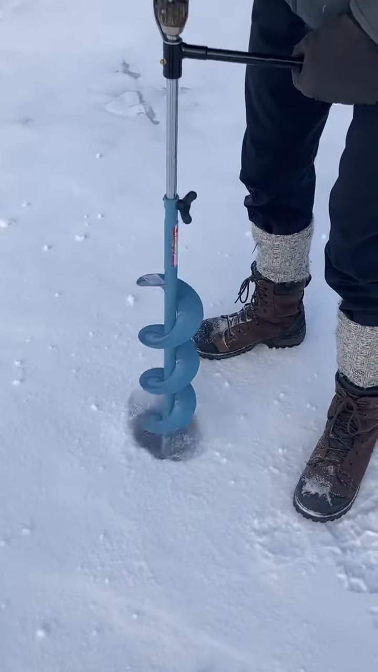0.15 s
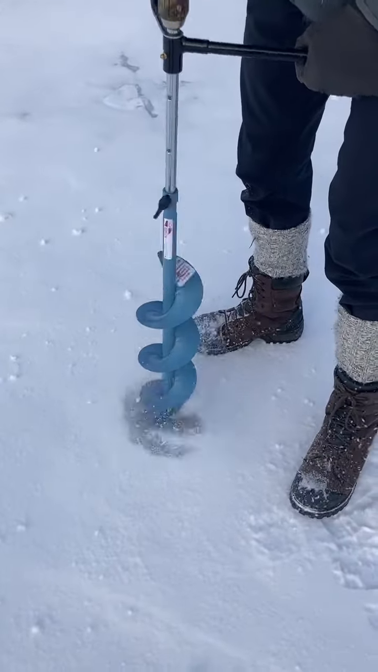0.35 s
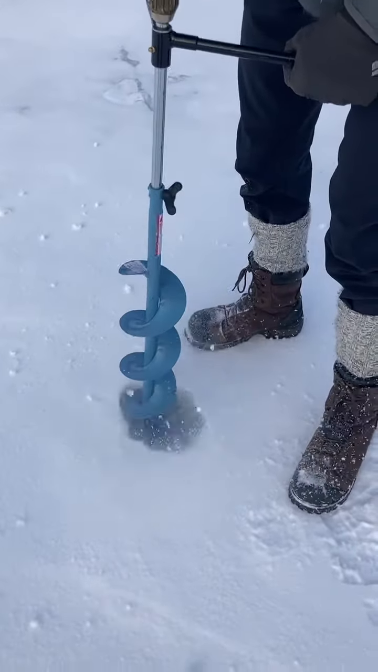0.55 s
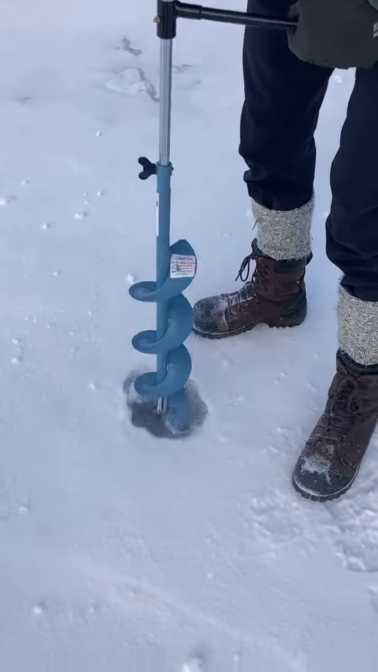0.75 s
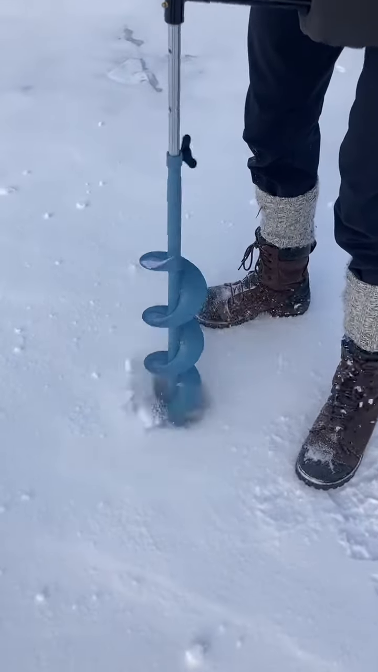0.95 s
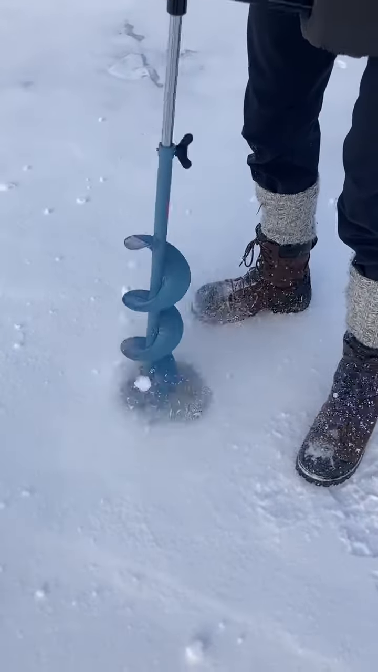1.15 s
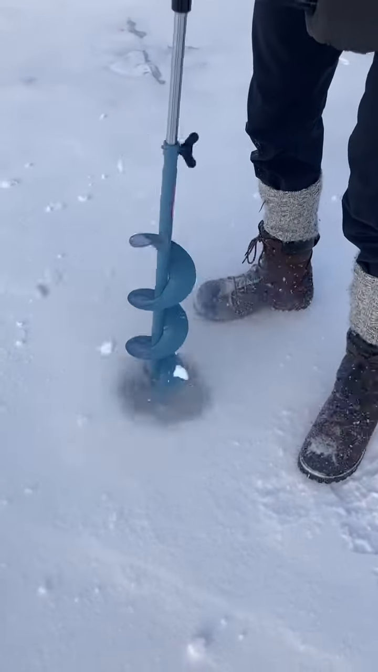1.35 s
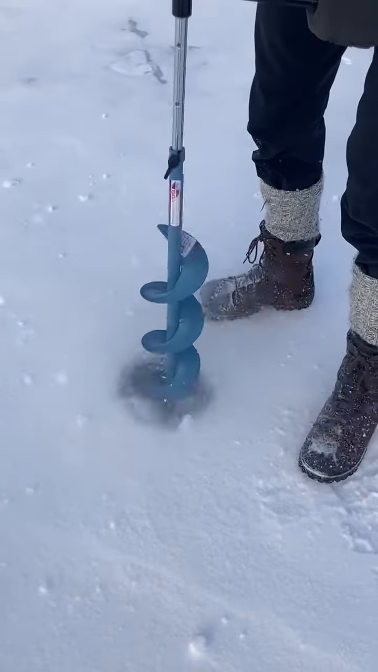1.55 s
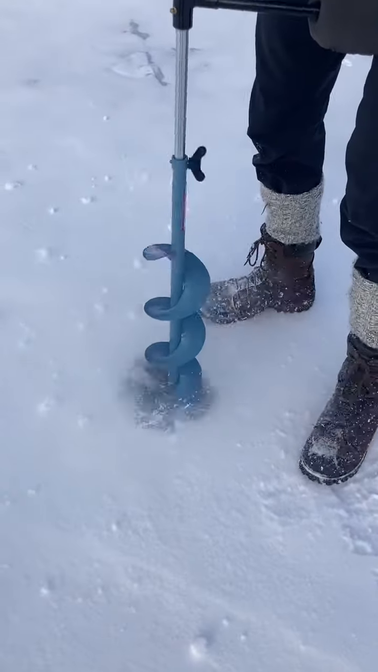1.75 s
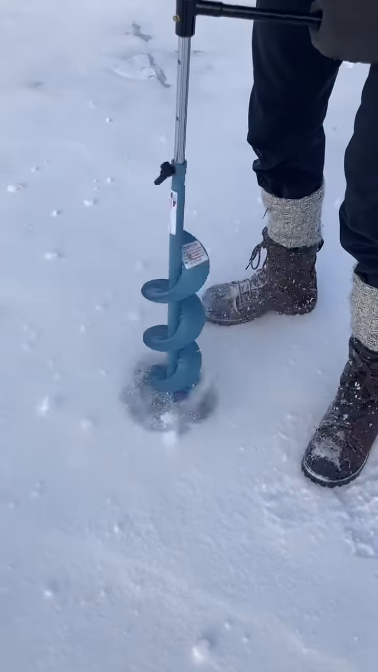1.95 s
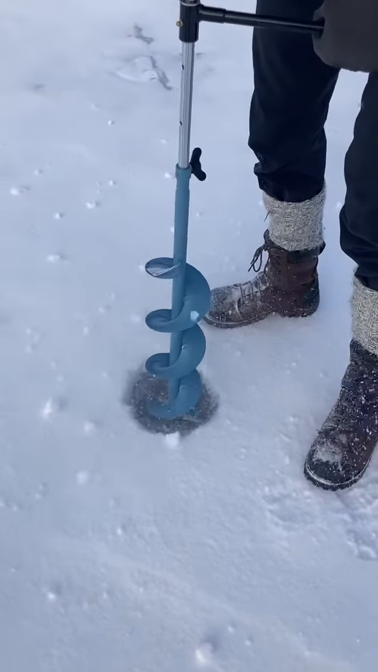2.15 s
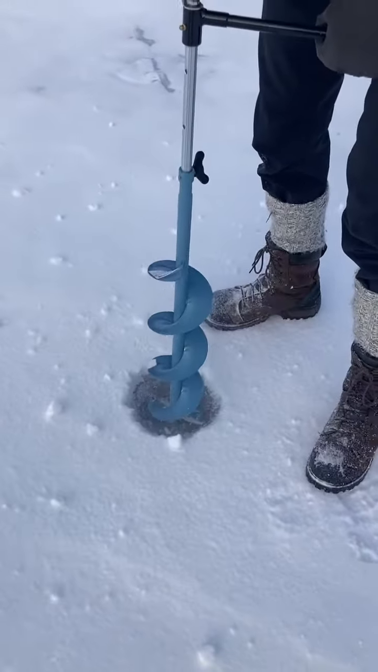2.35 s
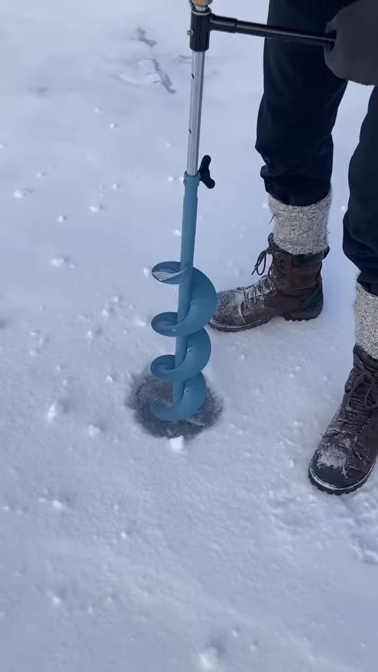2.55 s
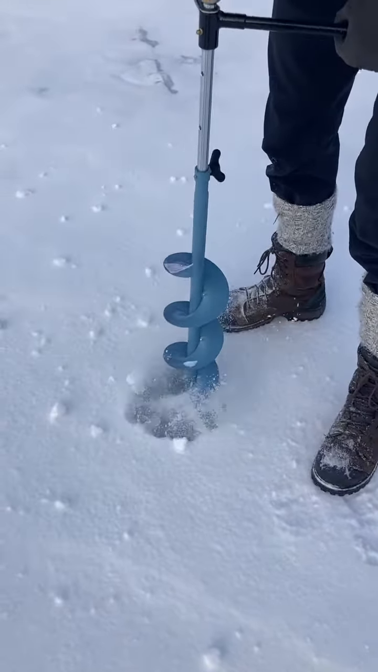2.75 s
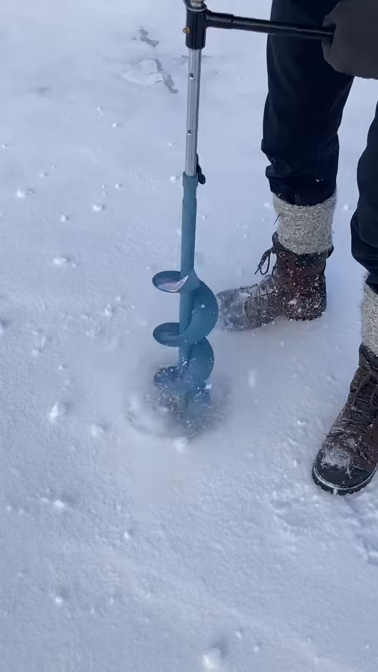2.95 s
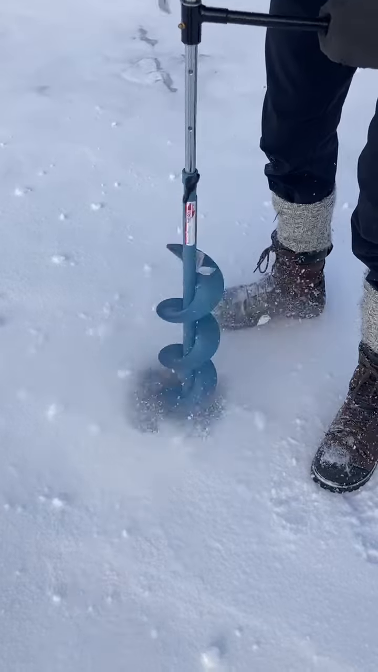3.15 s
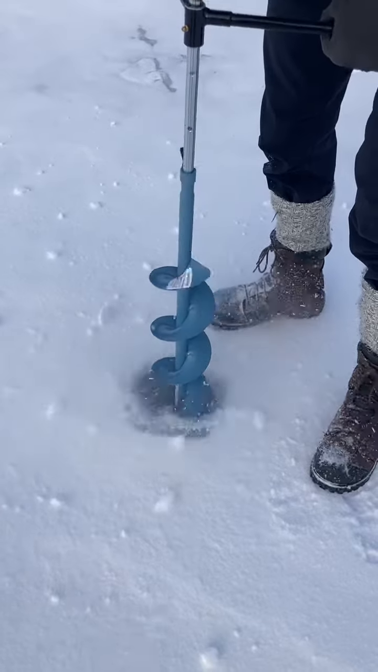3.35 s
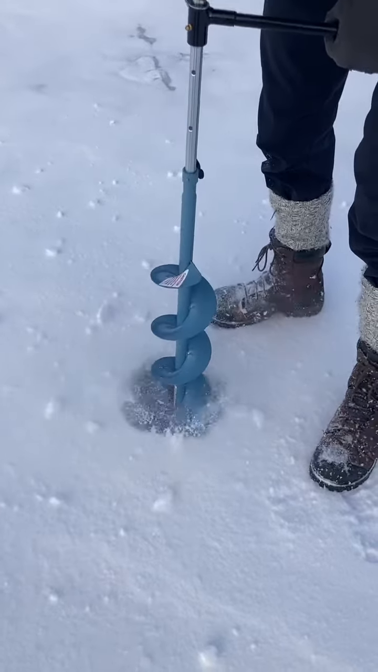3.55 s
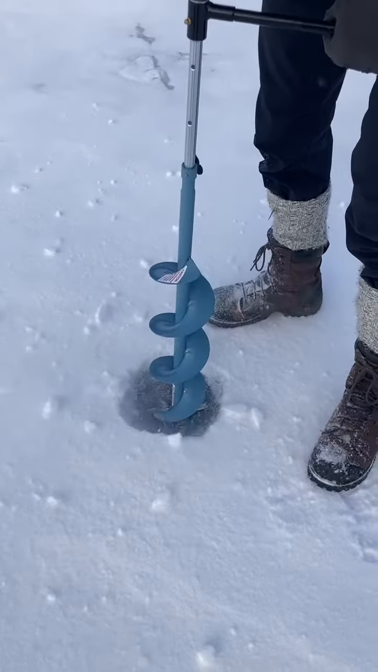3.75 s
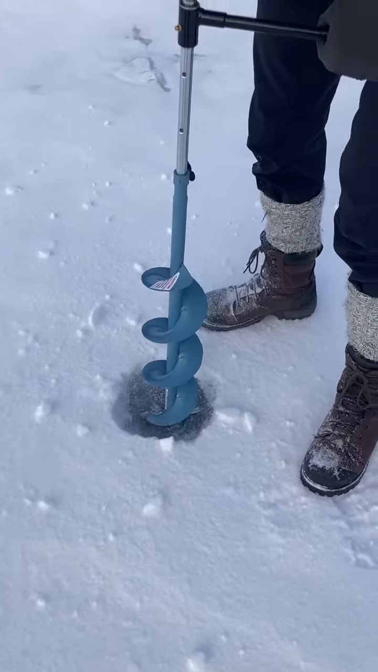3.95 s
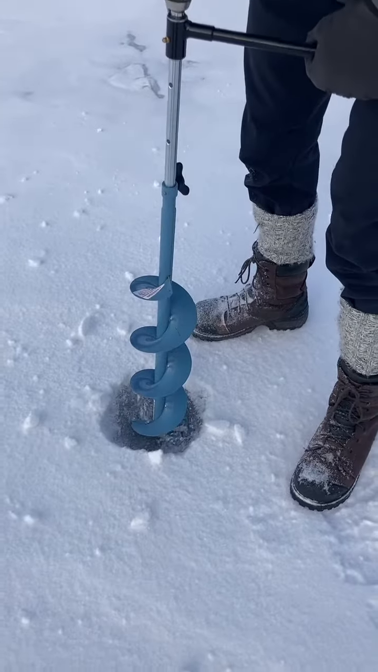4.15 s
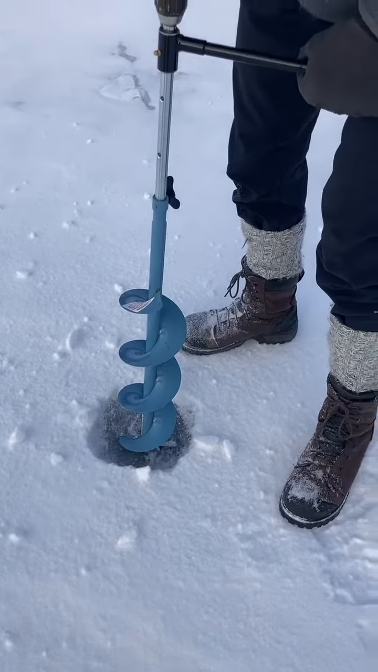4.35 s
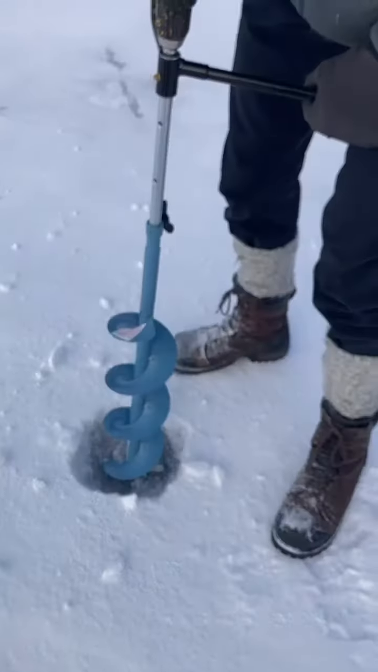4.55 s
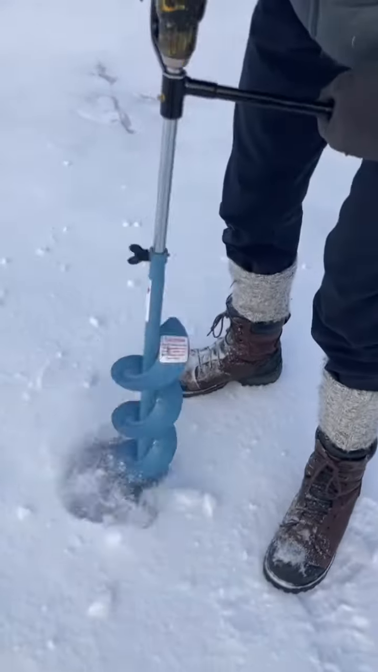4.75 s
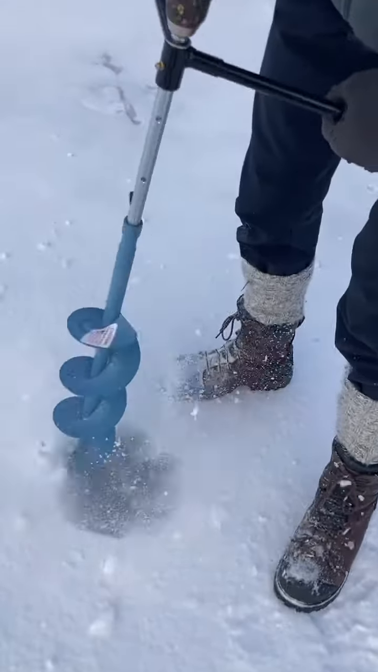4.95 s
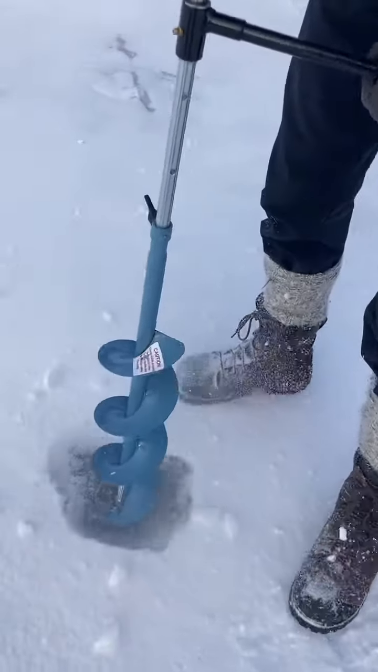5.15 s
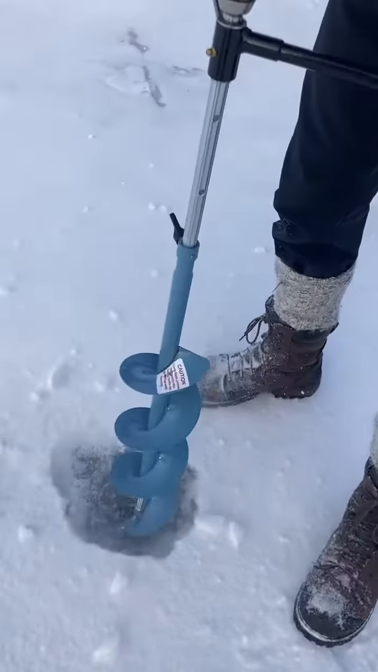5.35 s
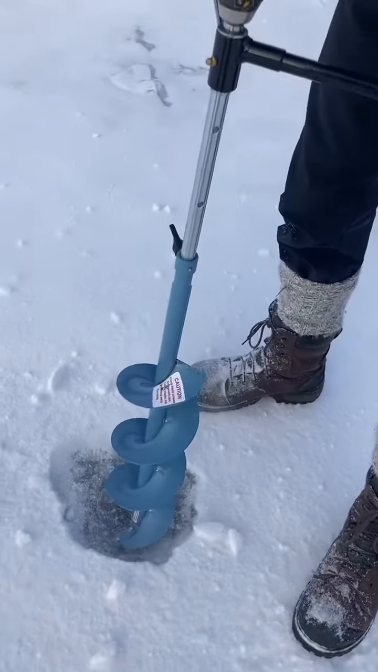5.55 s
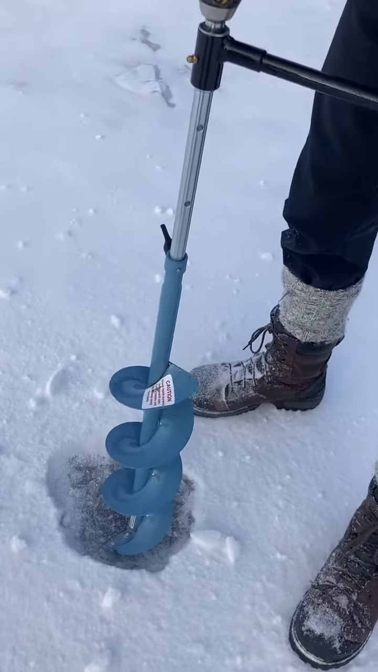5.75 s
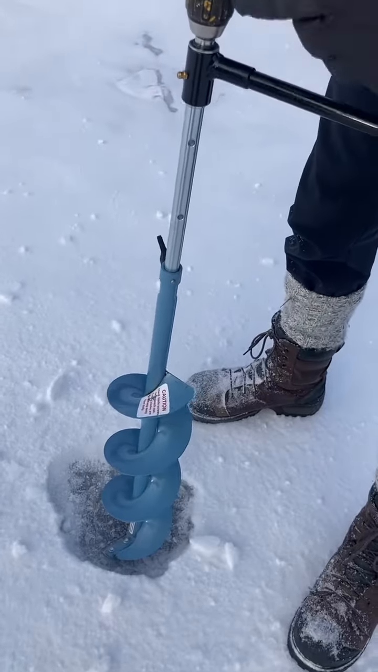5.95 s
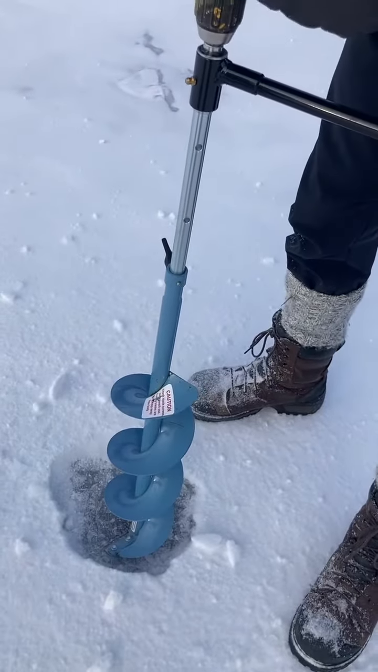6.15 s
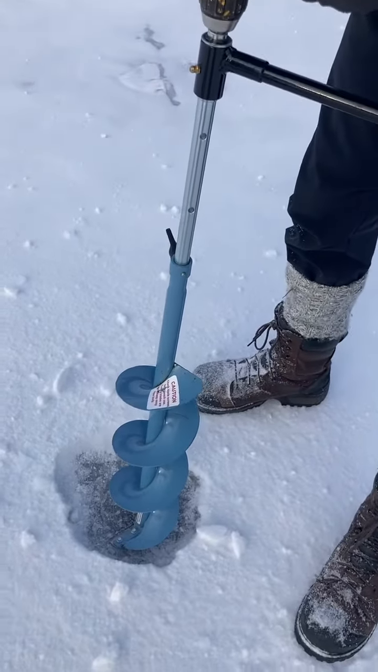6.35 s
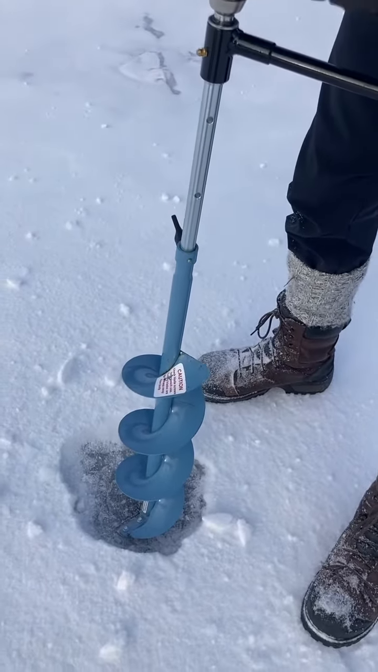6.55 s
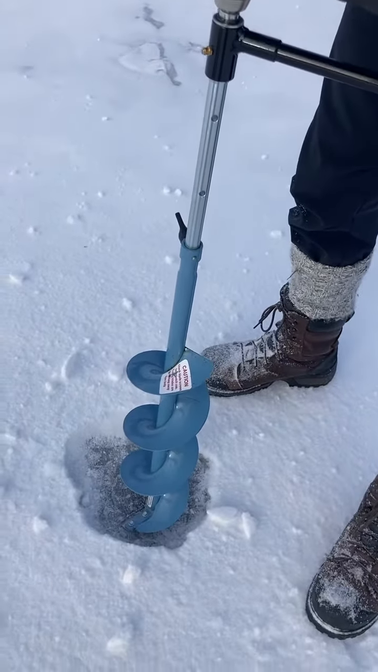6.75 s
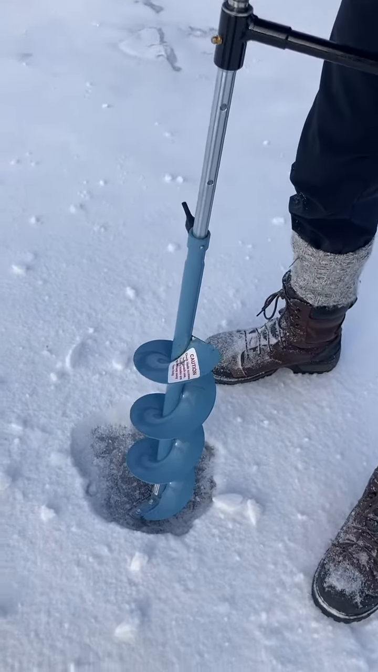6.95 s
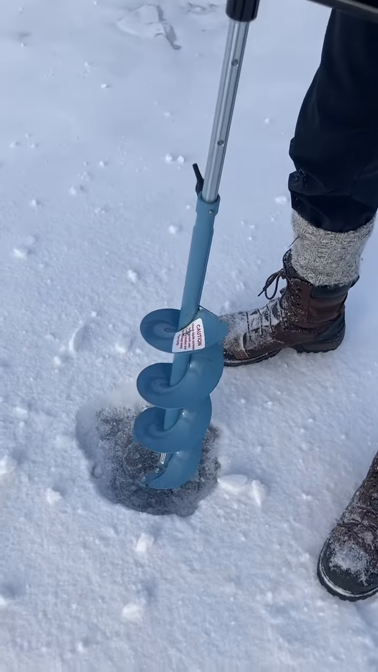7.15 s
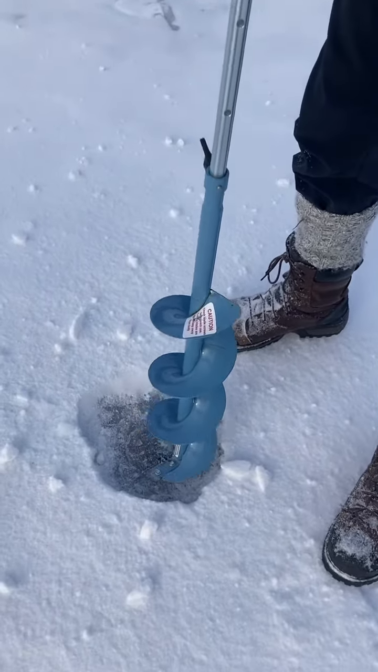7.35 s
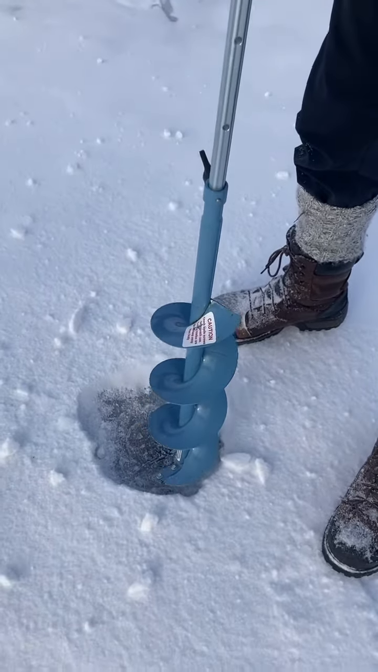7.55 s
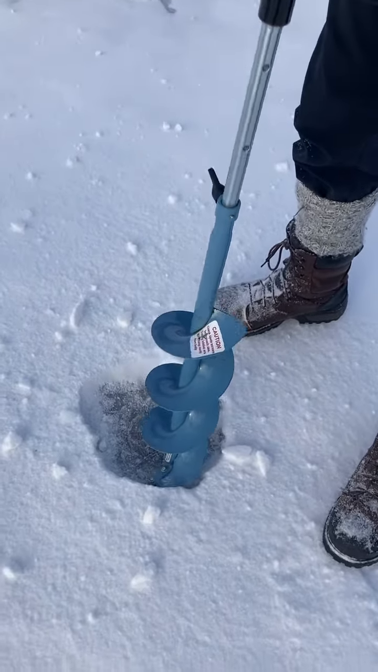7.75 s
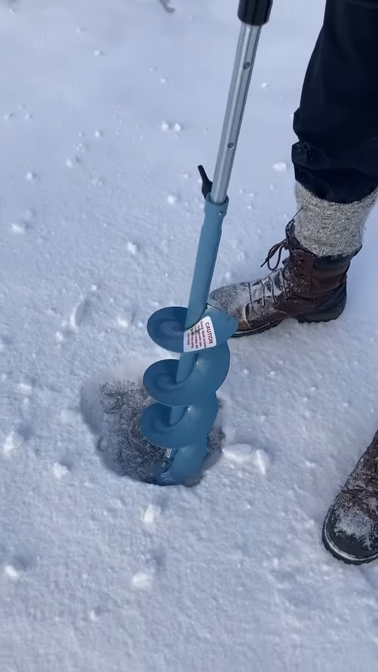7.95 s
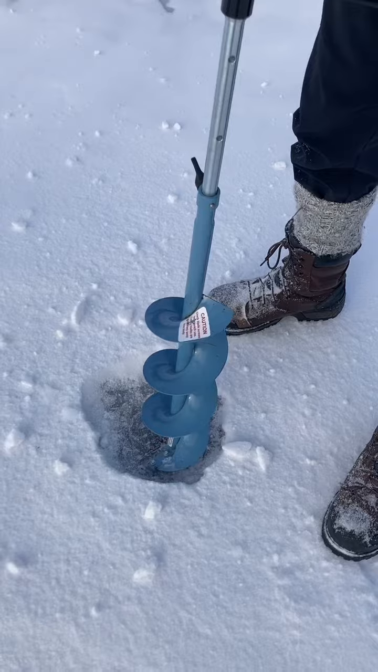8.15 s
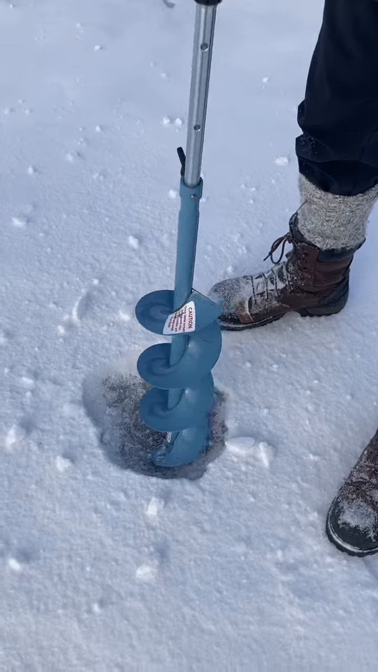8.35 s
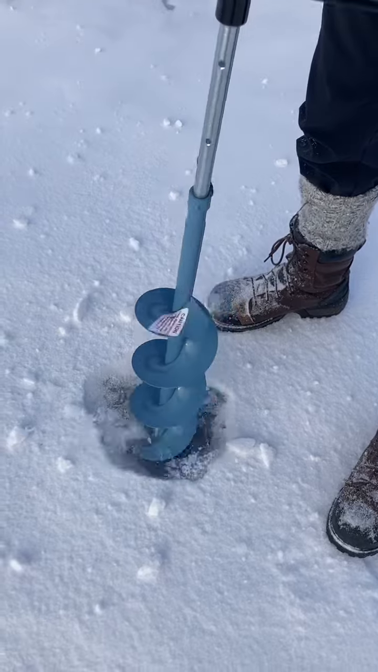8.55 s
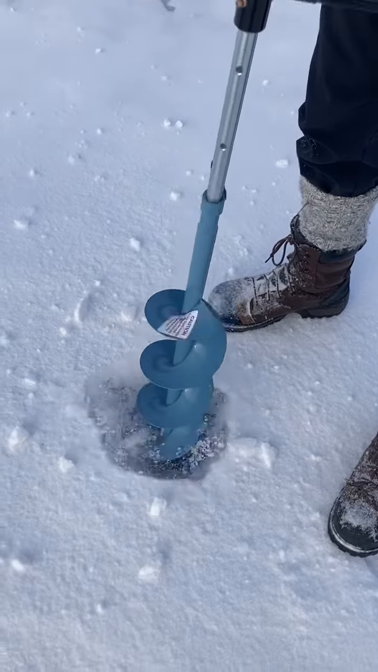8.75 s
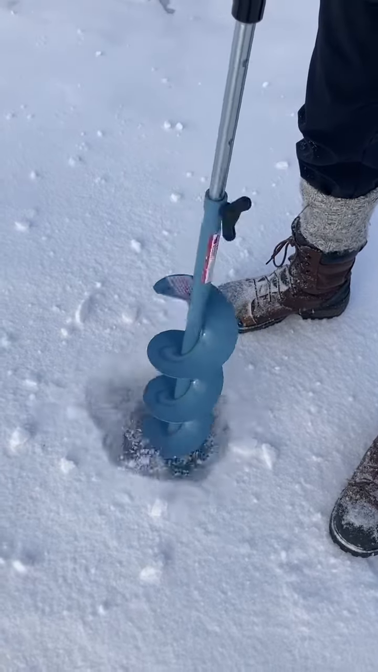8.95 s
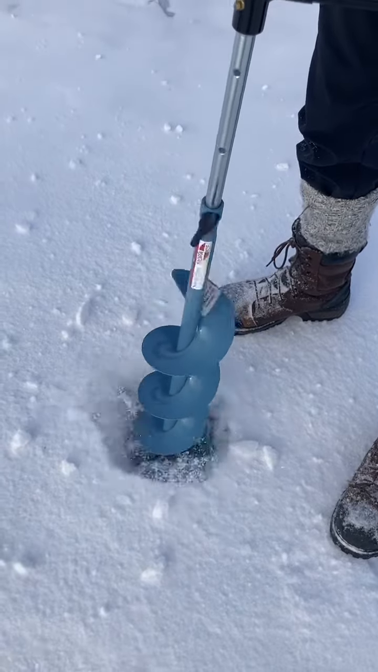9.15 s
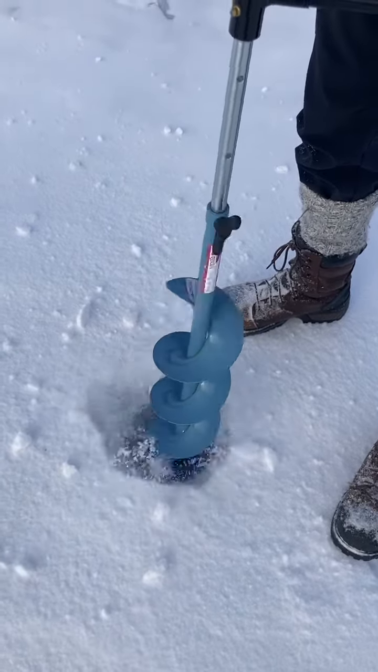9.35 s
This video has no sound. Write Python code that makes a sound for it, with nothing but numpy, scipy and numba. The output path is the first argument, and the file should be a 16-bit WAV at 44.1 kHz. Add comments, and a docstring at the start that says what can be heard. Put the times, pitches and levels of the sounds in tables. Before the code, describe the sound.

Outdoors on a frozen lake, close and dry, with faint low winter air. Drilling is already starting at 0 s: a loud gritty burst with sharp ice cracks and metallic knocks until 0.4. A longer run from 0.65 to 2.0 crunches and throbs about sixteen times a second, leaving a very faint tone. A third, 2.5 to 3.5, rings more in the tube, with rough gear whine. Around 4.0 blades scrape briefly; at 4.55 to 4.8 a short fast burst gives a hard clang, running down into scrapes. From 5 to 5.7 chips patter as small thuds under hissing ice dust, with a clink at 5.5. Quiet snow creaks and drops follow, dry clicks at 6.3 and, stronger, 7.2, then crunching boots, a scrape near 7.6 and a creak at 8.06. From 8.3 brisk grinding with higher whine and cracks continues until the end at 9.5.

```python
"""Hand auger drilling lake ice

A cordless drill spins a steel hand auger in lake ice, in bursts, a step away from a phone with two ports.
The blades shave ice in dense noise cracks that surge at each half turn and ring the modes of the auger tube;
the gears whine as a rough band of tone. Chips drop on snow as falling thuds, boots creak in clustered noise,
and short clinks and clicks sound between the runs, over hissing ice dust, a low rumble and open winter air."""
import sys
import numpy as np
from scipy import signal
from scipy.fft import rfft, irfft, next_fast_len
from scipy.io import wavfile
from scipy.ndimage import uniform_filter1d
from numba import njit

SR = 44100
rng = np.random.default_rng(int(sys.argv[2]) if len(sys.argv) > 2 else 0)


def wrap_up_sound(samples):
    """Save the sound to the file named by the first command line argument, as 16-bit audio."""
    columns = np.atleast_2d(samples).T
    # keep every value between -1 and 1, then stretch to whole-number steps
    tamed = np.clip(columns, -1, 1)
    steps = np.round(tamed * 32767).astype(np.int16)
    wavfile.write(sys.argv[1], SR, steps)


N = 414981
T = np.arange(N) / SR


def undb(db):
    """Decibels to amplitude."""
    return np.exp(np.asarray(db) * (np.log(10) / 20))


def unit(x):
    """Scale to an rms of 1."""
    return x / np.sqrt(np.mean(x ** 2))


def band(x, hz, width_hz):
    """Two-pole resonance, gain 1 at the centre."""
    return signal.lfilter(*signal.iirpeak(hz, hz / width_hz, SR), x)


def band_twice(x, hz, width_hz):
    """The same resonance twice in a row, for steeper skirts."""
    return band(band(x, hz, width_hz), hz, width_hz)


def colour(x, points, size=1024):
    """Causal filter shaped by (pitch_hz, level_db) points; keeps white noise at its level."""
    hz, db = np.transpose(points)
    grid = np.maximum(np.arange(size // 2 + 1) * SR / size, 1)
    # fold the cepstrum onto positive times: minimum phase
    cepstrum = irfft(np.interp(np.log(grid), np.log(hz), db) * np.log(10) / 20)
    cepstrum[1:size // 2] *= 2
    cepstrum[size // 2 + 1:] = 0
    taps = irfft(np.exp(rfft(cepstrum)))
    return signal.oaconvolve(x, taps / np.linalg.norm(taps))[:N]


def walk(rate):
    """Random levels held 1 / rate s and slewed; spread near 1."""
    hold = int(SR / rate)
    levels = np.repeat(rng.standard_normal(N // hold + 1), hold)
    return uniform_filter1d(levels, hold)[:N]


def grains(spread_db):
    """Dense cracks: most are small, a few stand out."""
    size_db = spread_db * np.minimum(rng.exponential(size=N), 4)
    return unit(rng.standard_normal(N) * undb(size_db))


def bursts(start_s, level_db, t60_s, rise_s):
    """Sum of envelopes with a quick rise and an exponential fall."""
    env = np.zeros(N)
    for start, top, fall in zip(start_s, undb(level_db), np.clip(t60_s, .01, 1)):
        i = int(start * SR)
        t = T[:min(int(fall * SR), N - i)]
        env[i:i + len(t)] += top * (1 - np.exp(-t / rise_s)) * 10 ** (-3 * t / fall)
    return env


EDGE_DB = 40  # depth of a rise or fall in level


def swells(start_s, stop_s, level_db, end_db, rise_s, fall_s):
    """Sum of envelopes: a rise from start, a hold that slides from level to end until stop, a fall."""
    env = np.zeros(N)
    for start, stop, level, end, rise, fall in np.broadcast(start_s, stop_s, level_db, end_db, rise_s, fall_s):
        times = np.maximum.accumulate([start, start + rise, stop, stop + fall, stop + 3 * fall])
        levels = [level - EDGE_DB, level, end, end - EDGE_DB, -150]
        on = slice(max(int(start * SR), 0), int(times[-1] * SR))
        env[on] += undb(np.interp(T[on], times, levels))
    return env


@njit
def drifting(x, hz, width_hz):
    """State-variable resonance whose centre moves, retuned every 64 samples; gain 1 at the centre."""
    y = np.empty(len(x))
    band_state, low_state, g, k = 0., 0., 0., 0.
    for i in range(len(x)):
        if i % 64 == 0:
            g, k = np.tan(np.pi * hz[i] / SR), width_hz / hz[i]
        v = (band_state + g * (x[i] - low_state)) / (1 + g * (g + k))
        band_state, low_state = 2 * v - band_state, 2 * (low_state + g * v) - low_state
        y[i] = k * v
    return y


def whine(hz, env, memory, waver):
    """A rough, wavering band of tone: slow noise carried up to hz; more memory narrows the band."""
    turn = np.exp(2j * np.pi * np.cumsum(hz * (1 + waver * walk(19))) / SR)
    rough = signal.lfilter([1], [1, -memory], rng.standard_normal((2, N)))
    tone = unit(np.real(turn * (rough[0] + 1j * rough[1])))
    return tone * env * undb(2 * walk(11))


# Spectrum of the cracking ice: pitch_hz, level_db (relative, per Hz)
ICE_SPECTRUM = [(40, -21.5), (80, -16), (400, -18.5), (820, -32), (1200, -29.5), (3300, -15), (4300, -9),
                (5100, -8.5), (6300, -3.5), (8300, 0), (11000, 0), (13500, -8), (15500, -9.5)]
CRUNCH_DB = -13  # coarse lumps torn off the ice, under the shaving


def auger():
    """Shaving, knocks and clinks: cracks in the ice, and the same kind of force in the tube."""
    crack_env, blow_env = auger_forces()
    cracks = colour(shards(patchy_db=3.0) * crack_env, ICE_SPECTRUM)
    lumps = crunch() * crack_env
    ring = tube(grains(1.2) * blow_env, patchy_db=3.0)
    blades = undb(CRUNCH_DB) * lumps + undb(3.5) * cracks + undb(1.0) * ring
    return blades, cracks_around(crack_env, blow_env)


# Drill runs: start_s, stop_s, shaving_start_db, shaving_stop_db, ring_db, spin_up_s, run_down_s,
# throb_origin_s (a time from which the half turns are counted), half_turns_per_s, gear_whine_db;
# shaving and ring are balanced further down the chain
DRILL_RUNS = [(0.021, 0.406, -19.5, -24, -29.5, 0.079, 0.2, 0.1, 14.6, -42),
              (0.65, 2.024, -25, -26, -35, 0.069, 0.057, 0.5, 16.1, -57),
              (2.493, 3.486, -27.5, -25.5, -37, 0.07, 0.069, 2.5, 15, -40),
              (4.547, 4.78, -26.5, -26.5, -30.5, 0.071, 0.4, 4.627, 27, -37.5),
              (8.281, 9.5, -23, -27, -30, 0.1, .05, 8.07, 20.3, -30)]
# Blades dragged over the ice by hand: start_s, stop_s, shaving_start_db, shaving_stop_db, ring_db, rise_s, fall_s
HAND_SCRAPES = [(3.913, 3.975, -41, -40, -46, 0.044, 0.034),
                (3.968, 4.079, -40.5, -28.5, -45, 0.029, 0.068),
                (4.355, 4.534, -57.5, -50.5, -58, 0.016, 0.15),
                (4.877, 5.033, -45.5, -33, -43.5, 0.017, 0.28), (5.12, 5.25, -59, -36, -66.5, 0.057, 0.057),
                (7.558, 7.64, -34, -36, -36.5, 0.053, 0.19), (7.75, 7.811, -59, -54, -67, 0.025, 0.038)]
# Single cracks and knocks of the blades, strong and faint: start_s, crack_db, tube_blow_db, t60_s;
# levels relative, trimmed as they are played
BLADE_KNOCKS = [(0.05, -21.5, -23, 0.085), (0.0701, -9.5, -33.5, 0.075), (0.119, -16, -24, 0.087),
                (0.1673, -2.5, -38.5, 0.053), (0.2284, -11, -29.5, 0.08), (0.2775, -7.5, -35, 0.059),
                (0.336, -4, -12.5, 0.088), (0.4, -13.5, -37, 0.08), (0.687, -33.5, -28, 0.088),
                (0.721, -20.5, -29.5, 0.27), (0.7508, 1, -24.5, 0.069), (0.767, -14, -26.5, 0.06),
                (0.805, -8.5, -34, 0.086), (0.817, -7.5, -25, 0.087), (0.852, -9.5, -34.5, 0.1),
                (0.866, -12, -34.5, 0.1), (0.9, -9.5, -20.5, 0.08), (0.927, 2.5, -11.5, 0.05),
                (0.956, -31, -22, 0.03), (0.9893, -4.5, -45, 0.08), (1.055, -27, -49, 0.06),
                (1.103, -12.5, -39, 0.051), (1.166, -28, -24, 0.055), (1.2254, -7.5, -48, 0.055),
                (1.2869, -12, -48, 0.055), (1.334, -29, -43, 0.06), (1.392, -5, -30, 0.054),
                (1.5628, -11, -38, 0.093), (1.622, -6.5, -30, 0.064), (1.674, -11.5, -33, 0.16),
                (1.81, -7.5, -29, 0.098), (1.8664, -4, -13, 0.074), (1.995, -20, -29, 0.09),
                (2.521, -39, -19, 0.07), (2.627, -14, -18.5, 0.12), (2.67, -15, -16.5, 0.17),
                (2.728, -14.5, -17, 0.11), (2.775, -19, -16.5, 0.09), (2.829, -8, -17.5, 0.13),
                (2.894, -8, -18.5, 0.1), (2.96, -6, -22, 0.065), (3.0253, -8, -51, 0.072),
                (3.068, -10, -31, 0.096), (3.131, -7.5, -43, 0.1), (3.2584, -26, -46, 0.072),
                (3.426, -11, -22, 0.096), (3.998, -33, -19, 0.04), (4.015, -29, -46, 0.03),
                (4.03, -14.5, -17, 0.067), (4.063, -14, -21, 0.067), (4.475, -23, -38, 0.087),
                (4.627, -32, -40.5, 0.061), (4.65, -5, -45.5, 0.06), (4.6785, 7, -3.5, 0.06),
                (4.691, -6.5, -29, 0.04), (4.714, -20.5, -17.5, 0.08), (4.741, -7.5, -17, 0.08),
                (4.79, -15, -48, 0.11), (4.914, -7, -46, 0.08), (4.959, -8, -48, 0.08),
                (4.985, -5, -8.5, 0.098), (5.2367, -21, -36, 0.059), (7.6216, -22, -22, 0.092),
                (7.635, -45, -32, 0.12), (7.6809, -21, -30, 0.069), (7.7, -56, -44, 0.36),
                (8.076, -20.5, -23.5, 0.11), (8.4136, -29, -47, 0.08), (8.466, -26, -29, 0.08),
                (8.546, -6, -27.5, 0.075), (8.743, -13, -34, 0.089), (8.8202, -10, -34.5, 0.15),
                (8.9386, -11.5, -14, 0.085), (9.042, -6.5, -45, 0.06), (9.182, -12.5, -35.5, 0.08),
                (9.3206, -12, -30.5, 0.14), (9.3907, -15, -32.5, 0.089)]
# Short clinks, clicks and ringing tails between the runs: start_s, crack_db, tube_blow_db, t60_s;
# levels relative, trimmed likewise
SHORT_CLINKS = [(2.2638, -38, -68, 0.056), (5.521, -22, -34, 0.05), (5.527, -16, -22, 0.088),
                (5.55, -54, -47, 0.93), (6.313, -27.5, -34.5, 0.022), (7.2149, -13, -25, 0.031),
                (4.19, -50, -40, 0.028), (8.198, -46, -60, 0.037)]
KNOCK_RISE_S, BLOW_RISE_S, CLINK_RISE_S = 0.0028, 0.007, 0.0006
RING_RISE_SHARE = 0.86  # of the spin-up or rise time: the tube rings before the blades cut fully


def auger_forces():
    """Envelopes of the cracking ice and of the blows to the tube; the blades catch and slip."""
    rows = [row[:7] for row in DRILL_RUNS + HAND_SCRAPES]
    start, stop, level_db, end_db, ring_db, rise, fall = np.transpose(rows)
    ring_end_db = ring_db + end_db - level_db
    surge = throb() * slip()
    crack_env = swells(start, stop, level_db, end_db, rise, fall)
    crack_env = crack_env * surge * undb(1.1 * walk(110) - 2.5)
    blow_env = swells(start, stop, ring_db, ring_end_db, RING_RISE_SHARE * rise, fall)
    blow_env = blow_env * surge * undb(1.5 * walk(60) - 2.0)
    for table, crack_rise_s, blow_rise_s, crack_trim_db in (
            (BLADE_KNOCKS, KNOCK_RISE_S, BLOW_RISE_S, 14),
            (SHORT_CLINKS, CLINK_RISE_S, CLINK_RISE_S, 8)):
        s, crack_db, blow_db, t60 = np.transpose(table)
        crack_env = crack_env + bursts(s, crack_db - crack_trim_db, t60, crack_rise_s)
        blow_env = blow_env + bursts(s, blow_db - 5.5, t60, blow_rise_s)
    return crack_env, blow_env


THROB_DB, THROB_SCATTER_DB = -10, 2.5  # size of the surge over the shaving, and its spread
THROB_FADE_SHARE = 1  # time constant of its fade, in half turns


def throb():
    """Each half turn of the auger a blade bites: a surge that fades until the next."""
    out = np.ones(N)
    for _, stop, _, _, _, _, _, throb_origin, half_turn_rate, _ in DRILL_RUNS:
        half_turns = (T - throb_origin) * half_turn_rate
        size = undb(THROB_DB + THROB_SCATTER_DB * rng.standard_normal(200))
        on = (half_turns >= 0) & (T < stop)
        fade = np.exp(-(half_turns[on] % 1) / THROB_FADE_SHARE)
        out[on] += size[half_turns[on].astype(int)] * fade
    return out


SLIP_SHARE, SLIP_S = 0.28, 0.01  # depth of the dip, and the time constant with which it deepens


def slip():
    """The blades slip and the shaving thins out in the moment before each of their single knocks."""
    out = np.ones(N)
    for knock in BLADE_KNOCKS:
        start = knock[0]
        before = slice(max(int((start - 8 * SLIP_S) * SR), 0), int(start * SR))
        out[before] *= 1 - SLIP_SHARE * np.exp((T[before] - start) / SLIP_S)
    return out


def shards(patchy_db):
    """Coarse, middle and fine shards of ice break in unrelated flurries."""
    total = np.zeros(N)
    for edge_hz, kind in ((4000, "low"), ((4000, 9000), "band"), (9000, "high")):
        sos = signal.butter(3, edge_hz, kind, fs=SR, output="sos")
        total += signal.sosfilt(sos, grains(2.5) * undb(patchy_db * walk(70)))
    return unit(total)


# Lumps of ice by size: pitch_hz, width_hz, level_db (relative)
LUMP_BANDS = [(1262, 300, -8.5), (2050, 960, -1), (2810, 810, 0), (3370, 700, -4.5), (4590, 430, 1.5)]


def crunch():
    """Lumps of each size tear off in their own flurries, with gaps between."""
    total = np.zeros(N)
    for hz, width_hz, level_db in LUMP_BANDS:
        flurries = grains(4.0) * undb(5 * walk(90))
        total += undb(level_db) * band_twice(flurries, hz, width_hz)
    return unit(total)


# Modes of the tube, with narrow ringing bands in the treble: pitch_hz (centre of its drift), width_hz,
# upright_db (in the hole), handled_db; levels are relative
TUBE_MODES = [(614, 171, -10.5, -11.5), (670, 26.8, -4.5, -6), (918.6, 24, -13.5, -11),
              (1088.4, 29, -2, -3), (1437, 36.7, -0.5, -5.5), (1495, 33, -1.5, -10), (1610, 36, -6, -5),
              (1804, 33, -14, -11.5), (1956, 30, -11.5, -11), (2166, 43, -13.5, -6), (2330, 40, -3.5, -9),
              (2615, 190, -10, -12), (3278, 98, -10, -8.5), (3826, 30, -13.5, -6), (4110, 40, -7, -12.5),
              (4330, 50, -12.5, -7.5), (7700, 37, -12.5, -15.5), (8150, 22, -16, -21),
              (8950, 98, -23.5, -37.5), (8900, 43, -11.5, -31.5)]
HANDLED_S = 3.7, 8.25  # the auger is lifted, tilted and dragged about, which damps other modes
WAVER_SHARE, WAVER_PER_S = .014, 12  # the modes drift as the blades press and ease


def tube(force, patchy_db):
    """The tube and flights ring in wavering modes; the blades drive now one mode, now another."""
    handled = (T > HANDLED_S[0]) & (T < HANDLED_S[1])
    ring = np.zeros(N)
    for k, (hz, width_hz, upright_db, handled_db) in enumerate(TUBE_MODES):
        drive = force * undb(np.where(handled, handled_db, upright_db) + patchy_db * walk(35))
        # modes above 1500 Hz drift by a smaller share
        centre_hz = hz * (1 + WAVER_SHARE * min(1, 1500 / hz) * walk(WAVER_PER_S))
        ring += (-1) ** k * drifting(drive, centre_hz, 1. * width_hz)
    modes = np.array(TUBE_MODES)
    white_power = undb(2 * modes[:, 2]) * np.pi * modes[:, 1] / SR
    return ring / np.sqrt(np.sum(white_power))  # rms near 1 for a white force on the upright tube


def cracks_around(crack_env, blow_env):
    """Cracks all round the hole arrive from other sides, unrelated to the blades' own."""
    middle = band_twice(grains(1.8) * (crack_env + 1.5 * blow_env), 1900, 2800)
    bright = colour(grains(1.4) * crack_env, ICE_SPECTRUM)
    return undb(-10) * middle + undb(-12.0) * bright


GEAR_HZ = 4404


def gears():
    """The drill's gears whine in a rough band of tone that swells and fades with each run."""
    start, stop, _, _, _, spin_up, run_down, _, _, gear_db = np.transpose(DRILL_RUNS)
    env = swells(start, stop, gear_db, gear_db, spin_up, run_down)
    return whine(GEAR_HZ, env, memory=.965, waver=.025)


LINGER_HZ, LINGER_S, LINGER_END_S, LINGER_DB, LINGER_END_DB = 1720, 2.07, 2.36, -59, -72


def lingering_tone():
    """A faint, narrow band of tone lingers after the second burst."""
    env = swells(LINGER_S, LINGER_END_S, LINGER_DB, LINGER_END_DB, 0.0089, .05)
    return whine(LINGER_HZ, env, memory=.997, waver=.008)


# Dry clicks: start_s, ring_db (before the mode levels)
DRY_CLICKS = [(6.314, -47), (7.2166, -20)]
# Hollow ring of a click: pitch_hz, width_hz, level_db (relative)
CLICK_BANDS = [(2710, 400, -7), (5960, 510, 8.5), (10540, 830, 0.5)]
CLICK_T60_S = 0.019


def clicks():
    """A short burst of cracks with a hollow ring, in a few broad resonances."""
    ring = np.zeros(N)
    for hz, width_hz, level_db in CLICK_BANDS:
        ring += undb(level_db) * unit(band_twice(rng.standard_normal(N), hz, width_hz))
    s, ring_db = np.transpose(DRY_CLICKS)
    return ring * bursts(s, ring_db, s * 0 + CLICK_T60_S, CLINK_RISE_S)


# Chips and lumps drop on snow: start_s, thud_db, pitch_scale_hz, tick_db, t60_s;
# levels are relative, and the thud settles towards a fixed share of its pitch scale
CHIP_DROPS = [(0.01, -36.5, 467, -46.5, 0.048), (0.495, -33, 286, -56, 0.04),
              (0.524, -41, 1000, -60, 0.034), (1.429, -24.5, 314, -39, 0.082), (2.077, -44, 224, -53, 0.05),
              (2.15, -38, 295, -53, 0.056), (2.333, -53, 407, -69, 0.075), (2.438, -60, 900, -52, 0.04),
              (2.525, -33, 535, -51, 0.045), (2.667, -25, 399, -50, 0.02), (3.584, -42, 290, -54, 0.042),
              (3.607, -47.5, 1010, -69, 0.039), (3.846, -50, 960, -61, 0.12), (3.974, -49, 259, -54, 0.067),
              (4.042, -29.5, 523, -35, 0.022), (4.315, -39.5, 490, -56.5, 0.018),
              (4.503, -41, 310, -46, 0.12), (4.774, -28, 380, -36, 0.038), (4.99, -23, 612, -37, 0.037),
              (5.102, -39, 486, -55, 0.037), (5.116, -46, 403, -57, 0.04), (5.145, -41, 395, -57, 0.059),
              (5.166, -41, 603, -57, 0.055), (5.18, -44, 530, -50.5, 0.04), (5.245, -41, 515, -53, 0.027),
              (5.284, -36, 403, -56, 0.042), (5.315, -24, 415, -57, 0.036), (5.195, -54.5, 170, -65, 0.062),
              (5.32, -30.5, 149, -65, 0.088), (5.45, -59, 183, -68, 0.07), (5.532, -44, 200, -62, 0.074),
              (5.331, -48, 520, -63, 0.04), (5.352, -47, 630, -61, 0.04), (5.365, -49, 557, -60, 0.044),
              (5.378, -57, 626, -60, 0.04), (5.395, -58, 450, -53, 0.04), (5.439, -41, 595, -64, 0.077),
              (5.484, -49, 540, -65, 0.047), (5.571, -50, 400, -56, 0.04), (5.675, -35, 300, -58, 0.052),
              (5.699, -45, 308, -55, 0.044), (6.125, -34, 480, -73, 0.13), (6.141, -31, 240, -46, 0.043),
              (6.155, -39.5, 364, -61, 0.044), (6.163, -48, 382, -54, 0.051),
              (6.187, -40, 254, -57.5, 0.031), (6.22, -35, 360, -60, 0.027),
              (6.381, -40.5, 273, -58, 0.049), (6.403, -47, 890, -59, 0.058), (6.532, -40, 320, -64, 0.054),
              (6.551, -46, 496, -63, 0.043), (6.58, -37, 266, -55, 0.06), (6.653, -29, 270, -50, 0.023),
              (6.725, -29, 320, -48, 0.045), (6.869, -40.5, 730, -56, 0.028),
              (6.93, -29.5, 750, -54, 0.044), (6.943, -39, 538, -52, 0.032), (6.959, -47, 570, -63, 0.031),
              (7.132, -38, 670, -67, 0.034), (7.153, -52, 700, -63, 0.03), (7.188, -48, 744, -68, 0.03),
              (7.256, -38, 536, -60, 0.036), (7.269, -51, 690, -60, 0.04), (7.288, -38, 696, -63, 0.043),
              (7.338, -51, 755, -69, 0.04), (7.495, -48, 350, -65, 0.035), (7.523, -51, 500, -68, 0.04),
              (7.315, -34.5, 552, -63, 0.043), (7.363, -40, 252, -62, 0.036), (7.383, -38, 700, -63, 0.11),
              (7.559, -42, 548, -63, 0.057), (7.627, -52, 1130, -42, 0.11), (7.63, -31.5, 720, -60, 0.059),
              (8.083, -57, 1070, -36.5, 0.049), (8.087, -45, 203, -65, 0.063),
              (8.466, -29, 298, -50, 0.062), (8.592, -26, 443, -50, 0.034)]
SPREAD_CYCLES, SPREAD_S = 0.76, 0.00043  # the ice sheet carries treble faster: pitch falls as cycles / (t + s)
RATTLE_DB, RATTLE_HZ, RATTLE_S = -16, 1500, .006  # a chip breaks into crumbs as it lands


def chips():
    """Each drop sends a wave through the ice sheet: treble first, then a quick fall to a low thud."""
    out = np.zeros(N)
    chance = rng.standard_normal((len(CHIP_DROPS), 4000))
    t = T[:4000]
    for (start, thud_db, hz, tick_db, t60), noise in zip(CHIP_DROPS, chance):
        # cycles done since landing
        cycles = hz * (.36 * t + 1.1 * 0.0031 * (1 - np.exp(-t / 0.0039)))
        cycles += SPREAD_CYCLES * np.log(1 + t / SPREAD_S)
        thud = np.sin(2 * np.pi * cycles) + .3 * unit(band_twice(noise, 1.4 * hz, 1.6 * hz))
        thud *= 1 + 2.0 * np.exp(-t / 0.006)  # firmer at the landing
        tick = unit(band_twice(noise, 2900, 3200)) * np.exp(-t / 0.0016)
        crumbs = unit(band(noise[::-1], RATTLE_HZ, RATTLE_HZ)) * np.exp(-t / RATTLE_S)
        hit = undb(thud_db - 3.0) * thud * 10 ** (-3 * t / max(t60, .01))
        hit += undb(tick_db + 17.0) * tick
        hit += undb(thud_db + RATTLE_DB) * crumbs
        i = int(start * SR)
        out[i:i + 4000] += hit * (1 - np.exp(-t / 0.00089))
    return out


# Spectrum of creaking snow: pitch_hz, level_db (relative, per Hz)
SNOW_SPECTRUM = [(60, -18.5), (200, 4), (600, 5.5), (1100, 6.5), (1600, 2.5), (2600, -5.5), (4600, -13),
                 (8000, -13.5), (15500, -30)]
# Fine crystals fizz above the creak: start_s, stop_s, start_db, stop_db
CRYSTAL_FIZZ = [(6.31, 6.597, -58, -68)]
FIZZ_HZ, FIZZ_WIDTH_HZ = 4300, 830
CREAK_RISE_S, CREAK_FALL_S = 0.033, 0.093


def boots():
    """Snow crystals break in uneven clusters under the soles."""
    crystals = grains(3.5) * undb(3.2 * walk(120) + 1.8 * walk(30))
    creak = colour(crystals * creaking(), SNOW_SPECTRUM) * undb(1.5)
    fizz = unit(band_twice(crystals, FIZZ_HZ, FIZZ_WIDTH_HZ))
    return creak + fizz * swells(*np.transpose(CRYSTAL_FIZZ), CREAK_RISE_S, CREAK_FALL_S)


# Snow creaks under the boots: start_s, stop_s, start_db, stop_db (relative)
BOOT_CREAKS = [(0.456, 0.517, -46, -47), (2.009, 2.288, -57.5, -64), (2.399, 2.467, -56, -62),
               (3.465, 3.615, -52, -61), (3.78, 3.907, -75, -61.5), (4.062, 4.405, -58.5, -74),
               (5.055, 5.31, -54, -60), (5.348, 5.49, -56, -65), (5.5, 5.632, -56, -74),
               (5.625, 5.866, -63, -63), (6.069, 6.338, -68.5, -61.5), (6.325, 6.492, -54, -46),
               (6.47, 6.656, -52.5, -57.5), (6.864, 6.95, -71.5, -66.5), (7.105, 7.217, -72, -54.5),
               (7.214, 7.56, -48.5, -50.5), (7.747, 8.054, -73, -64.5), (8.057, 8.106, -36, -68),
               (8.163, 8.227, -56, -67)]


def creaking():
    """How hard the boots press the snow."""
    return swells(*np.transpose(BOOT_CREAKS), CREAK_RISE_S, CREAK_FALL_S)


# Hiss of ice dust over time: time_s, level_db (relative)
DUST_HISS = [(0, -59), (0.7, -53), (2.05, -58.5), (2.5, -57), (3.55, -63), (3.9, -57), (4.16, -54.5),
             (4.25, -66.5), (4.4, -70), (5.1, -53), (5.5, -52.5), (5.9, -68.5), (5.97, -65.5), (6.1, -62),
             (6.3, -69.5), (6.4, -61.5), (6.75, -61.5), (6.9, -67), (7.18, -76), (7.3, -51.5), (7.6, -61.5),
             (8.0, -61.5), (8.3, -58), (9.41, -56)]
# Spectrum of the dust: pitch_hz, level_db (relative, per Hz)
DUST_SPECTRUM = [(300, -25.5), (1700, 2.5), (4000, 3), (8300, 5.5), (15500, 3.5)]


def dust():
    """Ice dust hisses down in fine, patchy grains."""
    falling = grains(2.5) * undb(3.5 * walk(36))
    hiss_db = np.interp(T, *np.transpose(DUST_HISS))
    return colour(falling * undb(hiss_db), DUST_SPECTRUM) * undb(2.0)


# rumble relative to the creak, drop, clink or scrape above it
CREAK_RUMBLE_DB, DROP_RUMBLE_DB, CLINK_RUMBLE_DB, SCRAPE_RUMBLE_DB = -11.5, -15, -29.5, -22.5
DROP_RUMBLE_T60_S = 0.079


def rumble():
    """Low noise under creaks, drops, clinks and scrapes, which the two ports mostly share."""
    shake = undb(CREAK_RUMBLE_DB) * creaking()
    s, thud_db = np.transpose(CHIP_DROPS)[:2]
    shake += bursts(s, thud_db + DROP_RUMBLE_DB, s * 0 + DROP_RUMBLE_T60_S, 0.0017)
    s, crack_db, _, t60 = np.transpose(SHORT_CLINKS)
    shake += bursts(s, crack_db + CLINK_RUMBLE_DB, 2 * t60, 0.002)
    start, stop, level_db, end_db, _, rise, fall = np.transpose(HAND_SCRAPES)
    shake += undb(SCRAPE_RUMBLE_DB) * swells(start, stop, level_db, end_db, rise, fall)
    shared, apart = [unit(band_twice(rng.standard_normal(N), 150, 220)) for _ in range(2)]
    return (shared + 0.16 * apart * np.array([[1], [-1]])) * shake


# Spectrum of the open air: pitch_hz, level_db (relative, per Hz)
AIR_SPECTRUM = [(25, -36), (45, -2), (80, 2), (300, -5), (1000, -10), (3000, -31.5), (15500, -39)]
AIR_DB = -72.5  # middle of its slow drift


def air():
    """Quiet open air: slowly drifting noise that the two ports mostly share."""
    shared, apart = [colour(rng.standard_normal(N) * undb(AIR_DB + 2 * walk(2.5)), AIR_SPECTRUM)
                     for _ in range(2)]
    return shared + .45 * apart * np.array([[1], [-1]])


def ports(x, phase, balance):
    """The sound reaches the two ports at different times, and the phone body shades them unequally."""
    size = next_fast_len(N + 512)
    hz = np.arange(size // 2 + 1) * SR / size
    lead_rad = np.interp(hz, *np.transpose(phase))
    balance_hz, balance_db = np.transpose(balance)
    tilt_db = np.interp(np.log(hz + 1), np.log(balance_hz), balance_db)
    half = undb(tilt_db / 2) * np.exp(.5j * lead_rad)  # each port takes half the difference
    return irfft(rfft(x, size) * np.array([half, 1 / half]), size)[:, :N]


# Phase between the ports for the auger: pitch_hz, left_lead_rad
AUGER_PHASE = [(0, 0), (600, -.5), (1500, -.2), (2200, 1.0), (3300, 1.6), (4500, 2.3), (5050, np.pi),
               (5850, np.pi), (7800, 2 * np.pi), (9200, 2 * np.pi), (11200, 3 * np.pi), (12300, 3 * np.pi),
               (14000, 4 * np.pi), (22050, 4 * np.pi)]
# Level between the ports for the auger: pitch_hz, left_minus_right_db
AUGER_BALANCE = [(60, 5), (110, -0.5), (200, 3.5), (380, -4), (700, -1), (1290, -5.5), (2380, -1.5),
                 (4400, 0.5), (8120, 1), (15000, -2)]
# Phase for the boots and chips, which lie off to one side: pitch_hz, left_lead_rad
GROUND_PHASE = [(0, 7), (340, 0.88), (860, 1.81), (1550, 1), (2150, 2.5), (4900, 2), (6100, 5.5), (7700, 5),
                (22050, 17.5)]


def scene():
    """The auger and drill close by, the snowy ground to one side, cracks all round and open air."""
    blades, around = auger()
    near = blades + gears() + lingering_tone() + clicks() + dust()
    ground = ports(chips() + boots(), GROUND_PHASE, [(60, 0.42), (15000, 0)])
    sides = around * np.array([[1], [-1]])  # opposite sign in the two ports
    return ports(near, AUGER_PHASE, AUGER_BALANCE) + ground + sides + rumble() + air()


TOP_HZ = 15700


def record(dry):
    """The phone rounds the loudest peaks, drops the deep bass and cuts the top."""
    dry = np.tanh(dry)
    dry = signal.sosfilt(signal.butter(2, 62, "high", fs=SR, output="sos"), dry)
    return signal.sosfilt(signal.ellip(10, .2, 70, TOP_HZ, fs=SR, output="sos"), dry)


dry = scene()
out = record(dry)
wrap_up_sound(out)
```